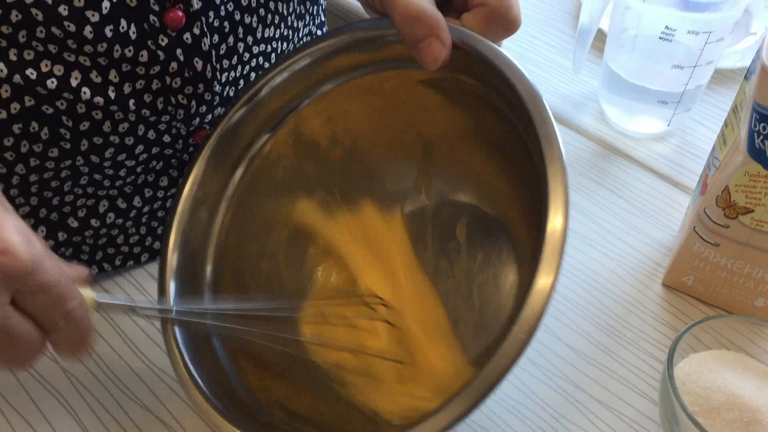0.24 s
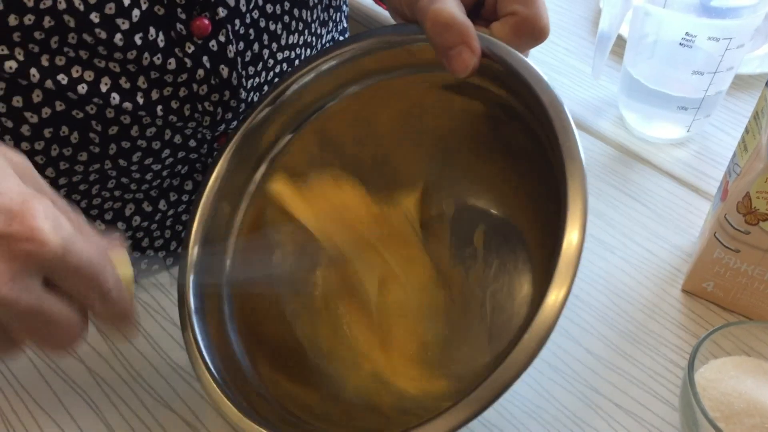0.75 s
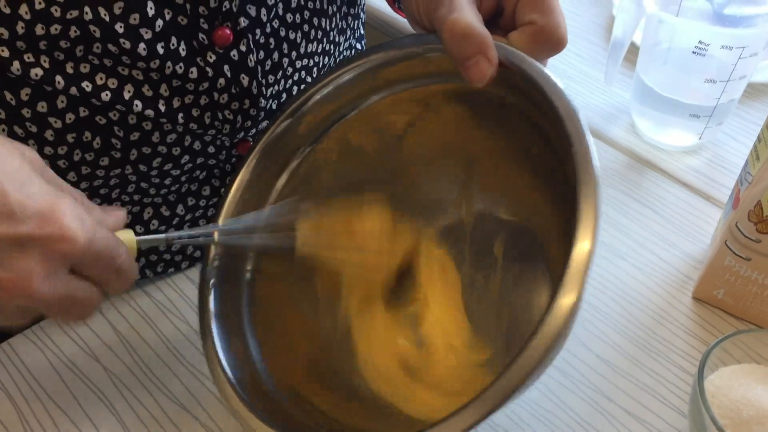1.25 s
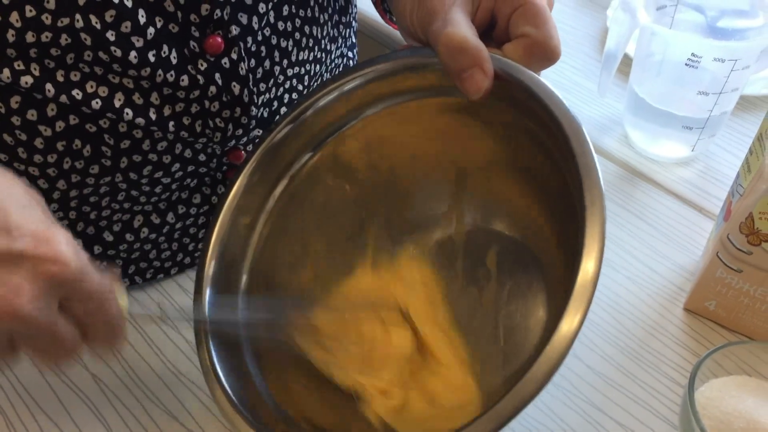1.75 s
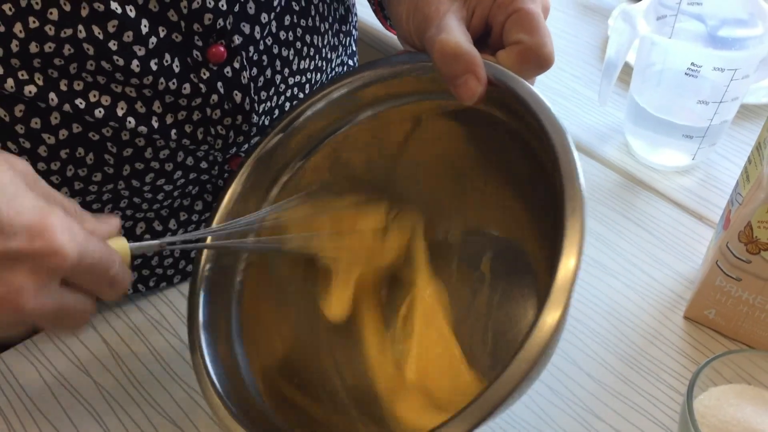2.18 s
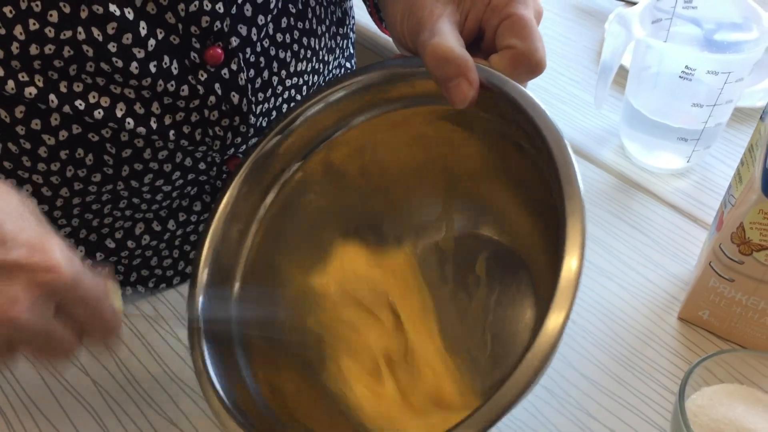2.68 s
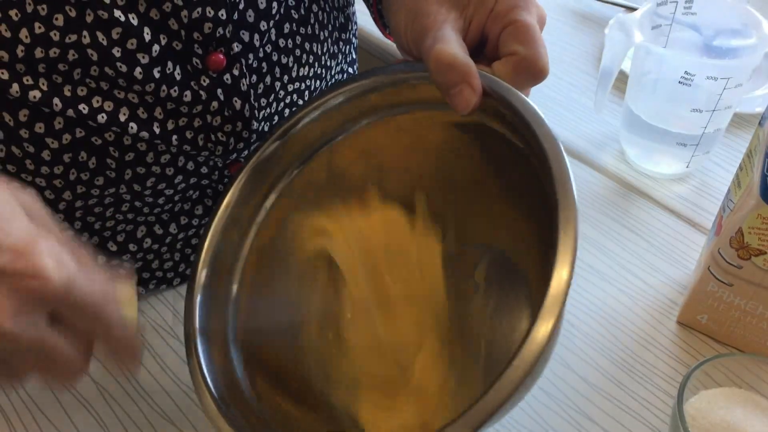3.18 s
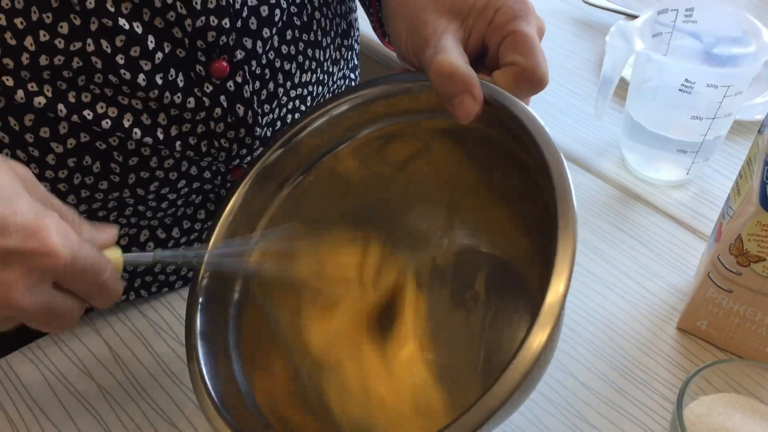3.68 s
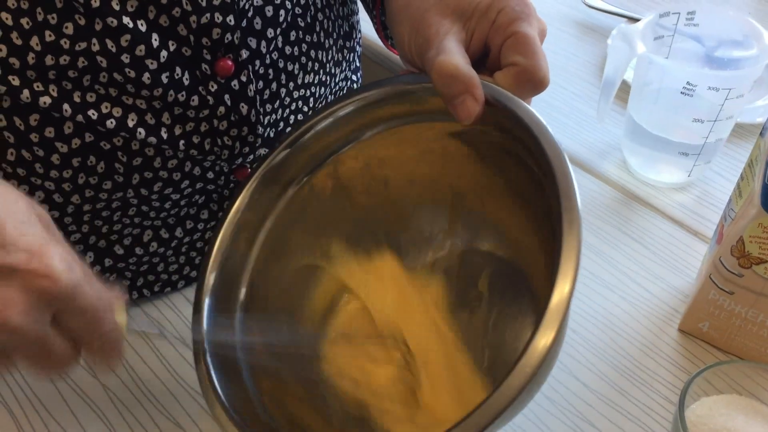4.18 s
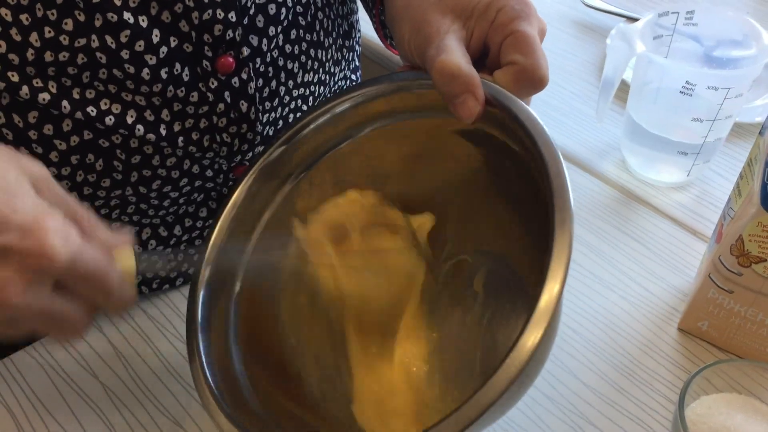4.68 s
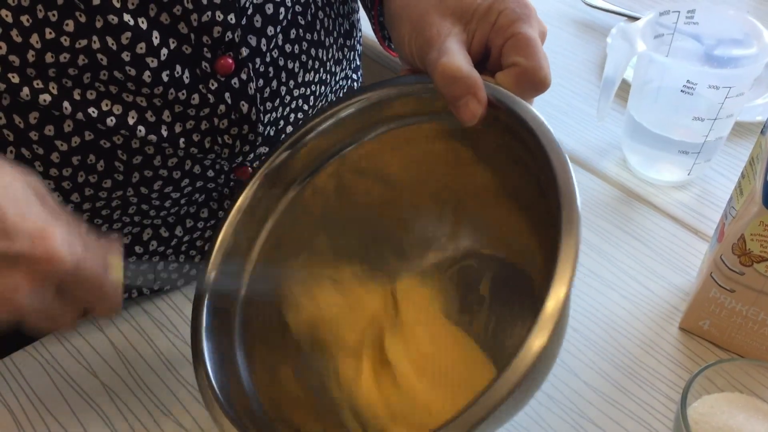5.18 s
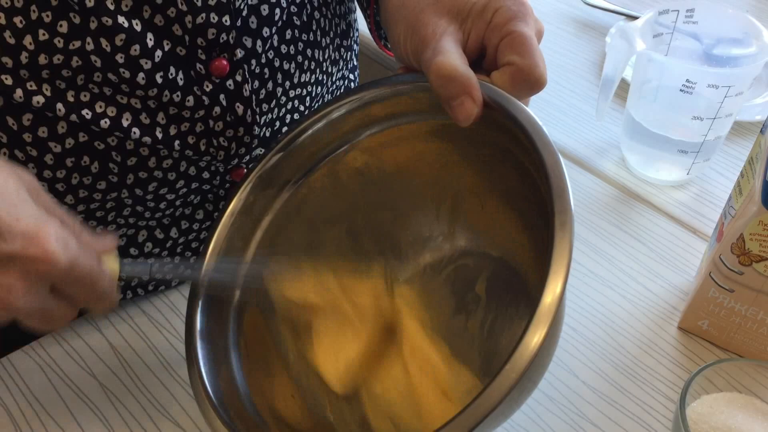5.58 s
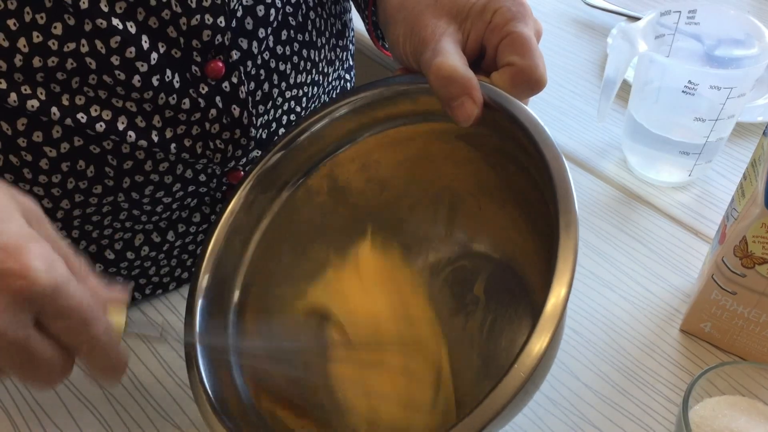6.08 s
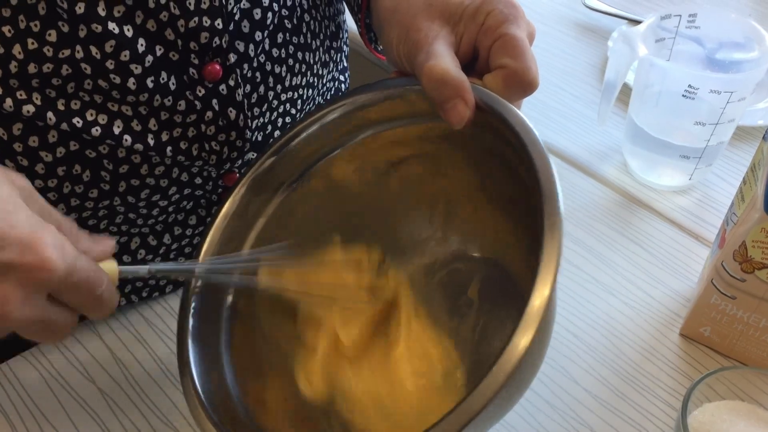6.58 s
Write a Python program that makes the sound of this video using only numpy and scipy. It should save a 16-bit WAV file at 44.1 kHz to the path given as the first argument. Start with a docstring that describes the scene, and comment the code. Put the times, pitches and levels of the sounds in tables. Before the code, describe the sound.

Close up in a kitchen, eggs are whisked briskly in a metal bowl without a pause. Each quick stroke brings a wet swish, little bubbly pops and a bright chatter of wires on steel, with a soft low knock from the bowl underneath. The rhythm stays even, about five beats a second, but the force varies, with the sharpest clacks around a third of the way in and again late on.

```python
"""A wire whisk beats eggs in a tilted steel bowl, five strokes a second, close by in a kitchen.
The wires chatter on the steel and ring its wall and bottom; each stroke scrapes and rocks the bowl.
The egg sloshes, its air pockets pop and its threads snap. Behind: room reflections and a faint rumble.
Loud blows overload the input."""
import sys
import numpy as np
from scipy import signal
from scipy.fft import rfft, irfft
from scipy.io import wavfile
from scipy.ndimage import uniform_filter1d

SR = 44100
rng = np.random.default_rng(int(sys.argv[2]) if len(sys.argv) > 2 else 0)


def generate_wav(sig):
    """Save sig (samples, or channels by samples) to the path in sys.argv[1] as 16-bit PCM at SR."""
    pcm = np.round(np.clip(np.atleast_2d(sig).T, -1, 1) * 32767).astype(np.int16)
    wavfile.write(sys.argv[1], SR, pcm)


N = 301952

# room decay: freq_hz, t60_s
ROOM_DECAY = [(150, 0.21), (1000, 0.42), (3000, 0.25), (7000, 0.24), (14000, 0.14)]
# whisk drags through the egg: start_s, swish_db, push_db
STROKES = [(0.089, -36, -44), (0.282, -33, -31.5), (0.467, -32.5, -31), (0.635, -29.5, -34.5),
           (0.834, -33.5, -38), (1.016, -30.5, -32.5), (1.204, -29.5, -30), (1.387, -28.5, -33),
           (1.586, -26.5, -25), (1.763, -31, -32.5), (1.944, -26.5, -28.5), (2.128, -30.5, -37.5),
           (2.303, -28, -36), (2.494, -29, -33), (2.691, -25.5, -28.5), (2.884, -29, -33),
           (3.072, -24.5, -27), (3.255, -24.5, -34), (3.442, -25, -34), (3.639, -30, -33),
           (3.824, -30.5, -33.5), (4.021, -29, -37.5), (4.206, -27, -35.5), (4.4, -29.5, -29),
           (4.594, -24.5, -27.5), (4.788, -29, -40), (4.977, -24, -33), (5.174, -29, -33),
           (5.353, -26.5, -30.5), (5.544, -31, -31.5), (5.747, -26, -35), (5.96, -32.5, -33.5),
           (6.15, -34, -26.5), (6.347, -28, -28), (6.532, -27, -39), (6.724, -28, -33)]
# flexing bowl, damped by hand and egg, and the table under it: freq_hz, width_hz, level_db
BODY_MODES = [(96, 18, -19), (176, 63, 3), (206.8, 33, 1), (258.7, 39, 1.5), (357, 12.3, -0.5),
              (472, 200, -5), (582.3, 44, 0)]
# froth and wash spectrum: freq_hz, level_db
FIZZ_SPECTRUM = [(100, -40), (300, -13.5), (1000, 1), (1450, 6.5), (3500, 7), (5000, 5), (9000, 0),
                 (15000, -8)]
# spectrum of wires sliding on steel: freq_hz, level_db
SCRAPE_SPECTRUM = [(1000, -69), (3500, 7.5), (5000, -2), (6200, 9), (7200, -24), (8800, 6.5), (10500, -3),
                   (15000, -0.5)]
# egg threads breaking: start_s, level_db
SNAPS = [(0.236, -19), (0.3571, -17), (0.592, -12), (0.955, -14), (0.979, -21), (0.9921, -24),
         (1.0078, -14), (1.3388, -18), (1.7489, -14), (2.2478, -9.5), (2.6249, -17), (2.813, -25),
         (3.019, -20), (4.154, -1), (5.1318, -7), (5.3127, -26), (5.382, 3), (5.6954, -24), (5.9792, -9),
         (6.0174, -4)]
# air pockets slapped in the egg: start_s, level_db, pitch_hz
POPS = [(0.056, -21, 1500), (0.0958, -10.5, 1366), (0.235, -18.5, 1680), (0.2913, -8, 1670),
        (0.357, -19, 2070), (0.459, -23, 1360), (0.4782, -3, 1440), (0.5918, -14.5, 2320),
        (0.6422, -19, 3070), (0.8275, -16.5, 2480), (0.8426, -6.5, 3220), (0.857, -8.5, 2100),
        (0.905, -19, 910), (0.9535, -18.5, 1450), (1.007, -17, 2090), (1.0254, -2.5, 2220),
        (1.3396, -13, 2730), (1.3942, -6.5, 1650), (1.457, -9, 3220), (1.5179, -18, 1430),
        (1.581, -21, 1490), (1.9504, -7, 1485), (2.03, -17, 1480), (2.0892, -16.5, 2960),
        (2.3818, -8, 2840), (2.4448, -19, 1940), (2.5, -7, 1465), (2.627, -17.5, 1880), (2.698, 1.5, 2100),
        (2.7321, -11, 635), (2.8135, -21, 1910), (2.8872, -16, 1370), (2.903, -7.5, 2160),
        (2.9414, -6.5, 2630), (3.0188, -13.5, 2680), (3.0754, -11, 3300), (3.0925, -9.5, 1550),
        (3.1327, -9.5, 2500), (3.2552, -20.5, 950), (3.322, -9, 2000), (3.4761, -5.5, 2820),
        (3.6415, -13.5, 2170), (3.685, -17, 2050), (3.7, -17, 2950), (3.8271, -12, 1390),
        (4.0257, -8.5, 1600), (4.0407, -11, 2090), (4.1547, -17.5, 1860), (4.2104, -14, 1980),
        (4.2504, -7.5, 3400), (4.2637, -11.5, 3240), (4.4053, -5, 2100), (4.4675, -6.5, 2120),
        (4.5995, -6, 1610), (4.6634, -18, 2530), (4.708, -19, 2580), (4.7909, -10.5, 2890),
        (4.854, -14.5, 2880), (4.9422, -18, 1460), (5.0147, -12.5, 768), (5.1817, -14, 1550),
        (5.1937, -12, 1600), (5.2335, -14, 3000), (5.3112, -18, 2570), (5.358, -15, 1370),
        (5.3813, -10, 787), (5.431, -18, 2680), (5.6962, -27, 970), (5.7574, -4, 1530), (5.83, -19, 2940),
        (5.9543, -17.5, 2920), (5.9722, -15, 1450), (5.99, -17, 542), (6.018, -16, 2116), (6.1569, 0, 1490),
        (6.2173, -9, 2020), (6.3816, -4.5, 3000), (6.537, -8, 1617), (6.6266, -18, 2810),
        (6.7622, -16, 650)]
# spectrum of wires tapping steel: freq_hz, level_db
TICK_SPECTRUM = [(80, -53), (300, -20), (1200, -19), (3000, -5.5), (5000, -6), (8500, 4.5), (10500, -0.5),
                 (15000, -4.5)]
# thin steel modes before egg damping: freq_hz, level_db, t60_s
STEEL_MODES = [(1450, -12, .025), (2040, -12, .025), (2830, -10, .025), (3430, -7, .03), (3655, -2, .04),
               (4445, -7, .035), (5320, -14, .015), (5630, -5, .025), (5830, -5, .02), (6100, -1, .036),
               (6220, -1, .034), (6480, -3, .022), (6660, -6, .02), (7570, -10, .018), (7750, -9, .015),
               (8120, -8, .016), (8590, -8, .02), (9650, -11, .012)]
# wire blows on the steel: start_s, wall_db, bottom_db, chatter_t60_s
BLOWS = [(0.0976, -4, -29, 0.015), (0.291, -13, -7, 0.029), (0.3106, -18, -32, 0.016),
         (0.478, -24, -22, 0.022), (0.5025, -36, -4, 0.04), (0.5135, -18.5, -15, 0.023),
         (0.6412, -6, -10, 0.016), (0.8427, -32, -16, 0.043), (1.0267, -11.5, -4, 0.014),
         (1.0589, -29.5, -10.5, 0.031), (1.214, -18.5, -46, 0.013), (1.2411, -26.5, -8, 0.042),
         (1.3944, -20, -24, 0.012), (1.4308, -24, -5.5, 0.044), (1.6141, -26.5, -14, 0.021),
         (1.642, -30.5, -17, 0.021), (1.7742, -17, -12, 0.02), (1.8011, -30, -10.5, 0.038),
         (1.9499, -8, -4, 0.033), (2.131, -2, -1, 0.038), (2.3084, 3, 0, 0.034), (2.38, -22.5, -32, 0.048),
         (2.4983, -2.5, -4, 0.029), (2.569, -33, -13, 0.066), (2.6947, -24.5, -25, 0.028),
         (2.7414, -36, -11, 0.049), (2.8882, -10, -26, 0.02), (2.9202, -27, -10, .044),
         (2.941, -32, -13, 0.012), (3.077, -17.5, -8.5, 0.028), (3.1143, -31, -12, .024),
         (3.2537, -22, -12, 0.012), (3.3187, -31, -10.5, 0.061), (3.4494, -25.5, -21, .033),
         (3.475, -33, -9, 0.015), (3.5124, -26.5, -17, 0.022), (3.6418, -20, -6, 0.03),
         (3.7207, -31.5, -26, 0.026), (3.8282, -0.5, -33, 0.022), (3.9054, -27.5, -23, 0.023),
         (4.0392, -31, -40, 0.027), (4.2093, -10.5, -35, 0.013), (4.2375, -39, -13.5, 0.022),
         (4.2476, -14.5, -31, 0.026), (4.4034, -20, -9.5, 0.017), (4.4519, -27, -3, .024),
         (4.468, -10, -26, 0.036), (4.5953, -9, -39, 0.014), (4.6457, -38, -15, 0.019),
         (4.6641, -29, -11, 0.048), (4.7907, -7, -11, 0.012), (4.855, -36.5, -16, 0.083),
         (4.981, 2, -5.5, 0.017), (5.212, -22.5, -5, 0.045), (5.234, -20, -12, 0.021),
         (5.3552, -2.5, -36, 0.033), (5.3817, -34, -10, 0.025), (5.432, -19, -12, 0.053),
         (5.5495, 3.5, 6, 0.021), (5.6238, -27.5, -16, 0.016), (5.7518, -6, -6, 0.029),
         (5.8276, -10, -7, 0.031), (5.9761, -31, -20, 0.026), (6.0183, -29, -18, 0.024),
         (6.154, -24, -7.5, .023), (6.181, -21, -9.5, 0.012), (6.218, -21.5, -14, 0.016),
         (6.345, -10, -37, 0.011), (6.3643, -35, -10.5, 0.055), (6.3874, -15, -1, 0.042),
         (6.5336, -7, -15, 0.024), (6.5782, -36, -32, 0.02), (6.6065, -17.5, -9, 0.024),
         (6.7246, -5.5, -7.5, 0.026), (6.8056, -22.5, -12, 0.033)]

DRAG_S, WAKE_S = 0.066, 0.18  # per stroke: wires drag, egg keeps popping


def gain(db):
    """dB to amplitude."""
    return 10 ** (np.asarray(db) / 20)


def decay(t, t60_s):
    """Exponential fall, 60 dB in t60_s."""
    return gain(-60 * t / t60_s)


def attack(t, tau_s):
    """Exponential rise to 1."""
    return 1 - np.exp(-t / tau_s)


def unit_rms(x):
    """Scale to rms 1."""
    return x / np.sqrt(np.mean(x ** 2) + 1e-20)


def lookup(table, hz):
    """Interpolate on a log-frequency axis."""
    freq_hz, value = np.transpose(table)
    return np.interp(np.log(hz + 1), np.log(freq_hz + 1), value)


def add(mix, start_s, sound):
    """Mix in at start_s."""
    part = mix[round(start_s * SR):][:len(sound)]
    part += sound[:len(part)]


def colour(x, spectrum):
    """Apply a spectrum, keep the rms."""
    response = gain(lookup(spectrum, np.fft.rfftfreq(len(x), 1 / SR)))
    return unit_rms(irfft(rfft(x) * response, len(x))) * np.sqrt(np.mean(x ** 2))


def resonate(x, hz, *widths_hz):
    """Unity-peak two-pole resonances in series, one per width."""
    for width_hz in widths_hz:
        x = signal.lfilter(*signal.iirpeak(hz, hz / width_hz, SR), x)
    return x


def scatter(per_stroke, span_s):
    """Random moments in each stroke. Rows: start_s, two normal draws."""
    start_s = np.repeat([row[0] for row in STROKES], per_stroke)
    return np.c_[start_s + span_s * rng.random(len(start_s)), rng.standard_normal((len(start_s), 2))]


def house_rumble():
    """Faint, wavering narrow-band noise."""
    centre_hz, width_hz = 47.6, 11
    return gain(-55.5) * unit_rms(resonate(rng.standard_normal(N), centre_hz, width_hz, width_hz))


def kitchen_reverb(x):
    """Sparse random-sign reflections, each band with its own decay; three tails crossfade."""
    out, turn_rad = np.zeros(N), np.pi * np.arange(N) / SR * 1.3
    for k in range(3):
        taps = np.zeros(SR // 2)
        slots = np.arange(120, len(taps) - 20, 20)
        taps[slots + rng.integers(0, 20, len(slots))] = rng.choice([-1., 1.], len(slots))
        hz, t, bands = signal.stft(taps, SR, nperseg=256)
        tail = signal.istft(bands * decay(t, lookup(ROOM_DECAY, hz)[:, None]), SR, nperseg=256)[1]
        share = np.sqrt(2 / 3) * np.cos(turn_rad + k * np.pi / 3)
        out += signal.fftconvolve(x * share, tail / np.linalg.norm(tail))[:N]
    return out


def bowl_rocking(force):
    """The whisk's push drives the low modes of bowl and table."""
    return sum(gain(db) * resonate(force, hz, width_hz, 3 * width_hz) * np.sqrt(SR / width_hz)
               for hz, width_hz, db in BODY_MODES)


def bubble(hz, t60_s, glide):
    """An air pocket rings; its pitch slides as its shape changes."""
    t = np.arange(round(t60_s * SR) + 8) / SR
    phase_rad = 2 * np.pi * hz * t * (1 + glide * t / t60_s)
    return attack(t, 1 / (3 * hz)) * decay(t, t60_s) * np.sin(phase_rad)


def froth():
    """Small bubbles of 24 sizes burst at random."""
    out, bursts_per_s = np.zeros(N), 14
    for hz in np.geomspace(500, 3800, num=24):
        bursts = (rng.random(N) < bursts_per_s / SR) * gain(3.1 * np.minimum(rng.exponential(1, N), 3))
        weight = gain(lookup(FIZZ_SPECTRUM, hz)) * hz / 1500
        out += weight * signal.oaconvolve(bursts, bubble(hz, 28 / hz, glide=0.3))[:N]
    return unit_rms(out)


def whisk_drag():
    """Each stroke sloshes the egg, scrapes the steel and pushes the bowl."""
    t = np.arange(SR // 2) / SR
    release_s = np.maximum(t - DRAG_S, 0)
    swish, scrape, push = np.ones((3, N)) * gain([[-43], [-62], [-48]])  # the egg never rests
    for start_s, swish_db, push_db in STROKES:
        add(swish, start_s, gain(swish_db) * attack(t, 0.0018) * decay(release_s, 0.23))
        add(scrape, start_s, gain(swish_db - 11) * attack(t, 0.0026) * decay(release_s, 0.28))
        add(push, start_s, gain(push_db) * attack(t, 0.0067) * decay(release_s, 0.13))
    bubbles = froth()
    # stick-slip: hiss and push come in lumps
    lumps = np.tanh(unit_rms(uniform_filter1d(rng.standard_normal((3, N)), size=200)))
    wash, rasp, shake = rng.standard_normal((3, N)) * gain([[4.0], [5.0], [3.5]] * lumps)
    slosh = gain(-0.5) * bubbles + gain(-1) * unit_rms(colour(wash, FIZZ_SPECTRUM))
    friction = unit_rms(colour(rasp, SCRAPE_SPECTRUM))
    return swish * slosh + scrape * friction + gain(-13.5) * bowl_rocking(push * shake)


def egg_snaps():
    """Threads of egg break with a dry, broadband click."""
    out, t = np.zeros(N), np.arange(400) / SR
    for start_s, db in SNAPS:
        add(out, start_s, gain(db) * decay(t, t60_s=0.0042) * rng.standard_normal(len(t)))
    return signal.sosfilt(signal.butter(2, [1470, 8500], "band", fs=SR, output="sos"), out)


def egg_pops():
    """Air pockets burst: wet spatter plus a bubble tone. Smaller ones die sooner."""
    out, t = np.zeros(N), np.arange(2000) / SR
    wake_pops = [(start_s, -27 + level_draw, 1954 * 2 ** (0.54 * pitch_draw))
                 for start_s, level_draw, pitch_draw in scatter(1, WAKE_S)]
    for start_s, db, hz in POPS + wake_pops:
        t60_s = 0.027 * (1500 / hz) ** 0.77
        spatter = unit_rms(resonate(rng.standard_normal(len(t)), hz, 1.17 * hz, 2.35 * hz))
        add(out, start_s, gain(db - 2.5) * attack(t, 0.0011) * decay(t, 1.32 * t60_s) * spatter)
        glide = 0.1 + 0.168 * rng.standard_normal()
        add(out, start_s, gain(db) * bubble(0.979 * hz, t60_s, glide))
    return out


def steel_ring(t, wall_db, bottom_db):
    """Bowl impulse response. The strike point favours some modes; egg detunes and damps them."""
    hz, db, t60_s = np.array(STEEL_MODES).T[:, :, None]
    is_wall = hz > 5000
    place, detune, wetness = rng.standard_normal((3, len(hz), 1))
    damping = np.exp(0.3 * abs(wetness) + np.where(is_wall, 0, 0.25))
    level = gain(np.where(is_wall, wall_db, bottom_db) + db + 1.5 * place)
    tones = np.sin(2 * np.pi * hz * (1 + 0.011 * detune) * t)
    return (level * decay(t, t60_s / damping) * tones).sum(0)


def wire_clatter():
    """Wires land in a dying chatter; each tap ticks and rings the steel."""
    t, taps_per_s = np.arange(6000) / SR, 5000
    ticks, rings = np.zeros(N), np.zeros(N)
    brushes = [(start_s, -33.5 + 2.5 * wall_draw, -33.5 + 2.5 * bottom_draw, 0.019)
               for start_s, wall_draw, bottom_draw in scatter(2, DRAG_S)]
    for start_s, wall_db, bottom_db, chatter_t60_s in BLOWS + brushes:
        taps = rng.standard_normal(len(t)) * (rng.random(len(t)) < taps_per_s / SR)
        taps *= gain(2.17 * rng.exponential(1, len(t)))
        attack_s = 0.00023 * gain(-0.5 * wall_db)  # light blows start softer
        taps = unit_rms(taps) * attack(t, attack_s) * decay(t, chatter_t60_s)
        add(ticks, start_s, gain(6 + 0.62 * wall_db) * taps)  # grows more slowly than the ring
        ring = steel_ring(t, wall_db, bottom_db)
        add(rings, start_s, signal.fftconvolve(ring, taps / np.linalg.norm(taps)))
    return colour(ticks, TICK_SPECTRUM), rings


def scene():
    """Wires, steel and egg, direct and through the kitchen, over the rumble. Mono."""
    ticks, rings = wire_clatter()
    drag = whisk_drag()
    cavity_hz, cavity_width_hz = 1420, 120  # air in the bowl
    egg = egg_pops() + egg_snaps() + drag + gain(-1.5) * resonate(drag, cavity_hz, cavity_width_hz)
    # less of the steel ring goes to the room, so its tones die away quickly
    room_send = gain(-7) * ticks + gain(-13) * rings + gain(-10.5) * egg
    return (ticks + rings + egg + house_rumble() + kitchen_reverb(room_send))[None]


def record(dry):
    """Clip at full scale, then band-limit."""
    low_hz, high_hz = 42, 15350
    highpass = signal.butter(2, low_hz, "high", fs=SR, output="sos")
    lowpass = signal.firwin(401, high_hz, window=("kaiser", 8), fs=SR)
    return signal.oaconvolve(signal.sosfilt(highpass, np.clip(dry, -1, 1)), lowpass[None], "same")


dry = scene()
out = record(dry)
generate_wav(out)
```